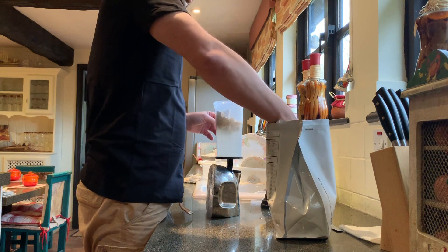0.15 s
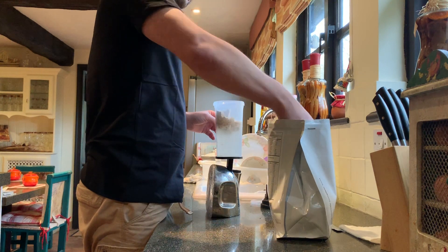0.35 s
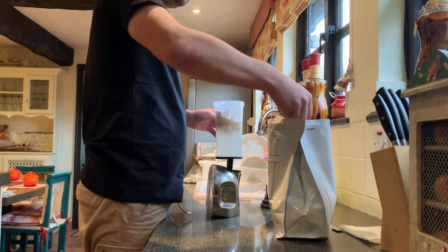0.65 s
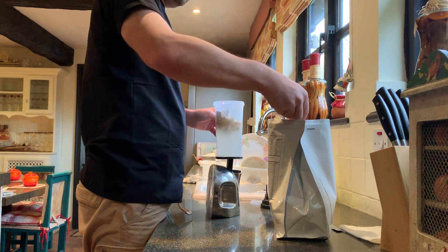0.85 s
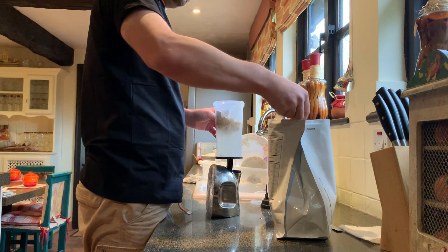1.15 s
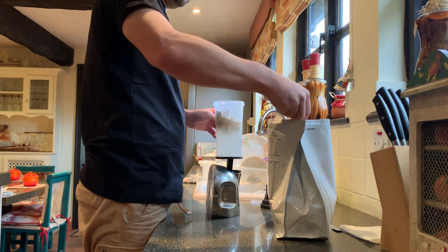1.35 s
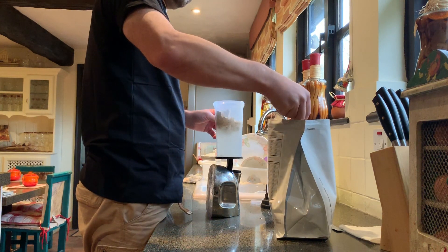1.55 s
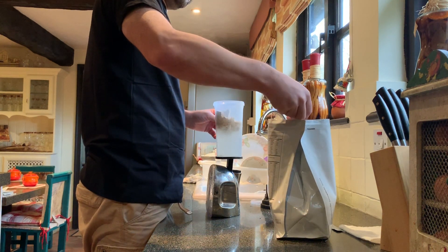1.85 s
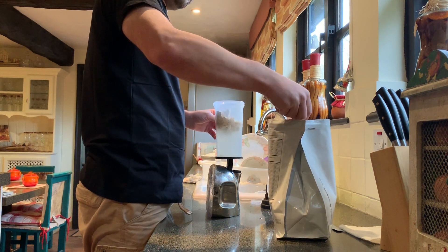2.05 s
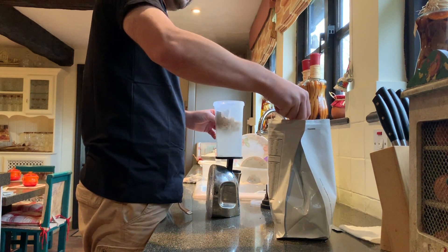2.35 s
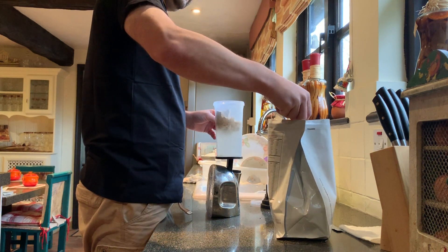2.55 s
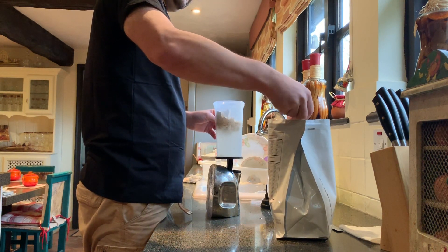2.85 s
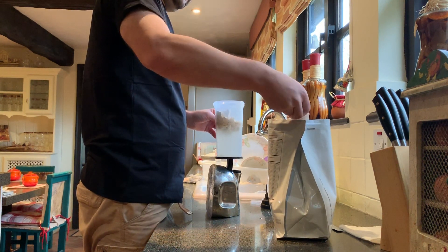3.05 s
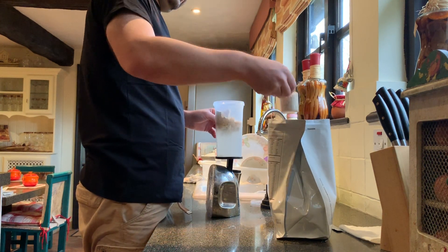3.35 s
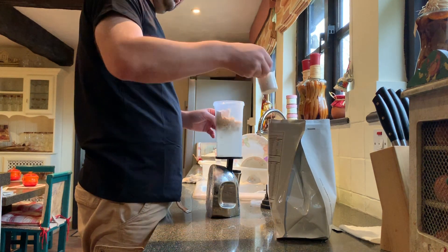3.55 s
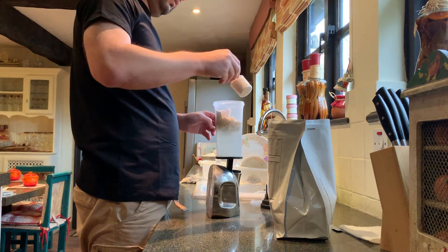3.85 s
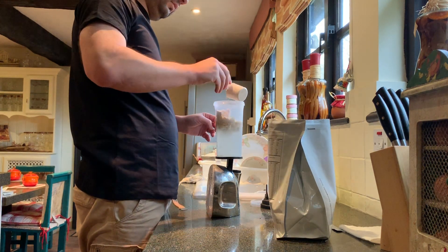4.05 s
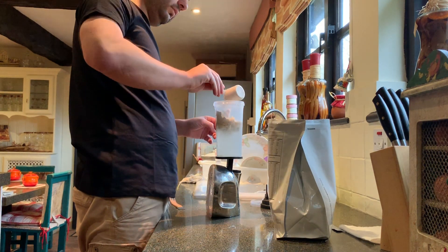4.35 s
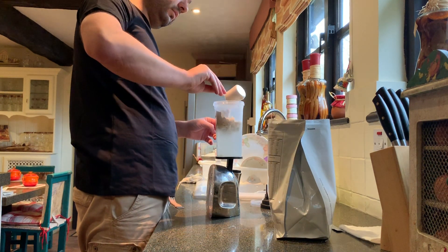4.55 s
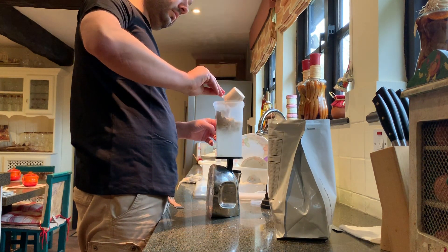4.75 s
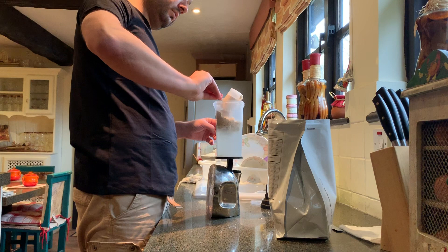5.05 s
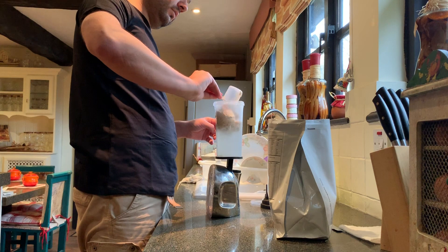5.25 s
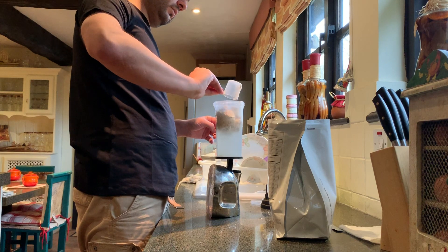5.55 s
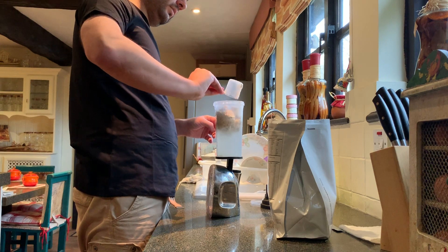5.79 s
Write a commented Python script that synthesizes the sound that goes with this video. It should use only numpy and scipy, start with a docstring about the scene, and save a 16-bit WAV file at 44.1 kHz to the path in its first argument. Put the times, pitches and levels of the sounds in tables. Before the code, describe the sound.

In a small hard kitchen with a low fridge hum, a hand and plastic scoop scrape loudly along a stiff bag of powder, crackling and thudding. Quieter, separate digs and rubs follow with gaps between. Then the scoop leaves, powder hisses very faintly, and a soft dull knock meets a plastic cup. Close phone pickup, stereo but nearly centred.

```python
"""A plastic scoop is drawn up through a stand-up bag of powder on a kitchen counter, levelled against the
inside wall in short rubs, then carried to a shaker cup. Stick-slip clicks make the stiff film crackle and the
hollow of the bag ring; noisy blows on damped modes make the packed powder and the cup thud; fine clicks hiss
as powder pours. A wavering sine is the fridge, in the air noise of a small, hard room; a phone stands near."""
import sys
import numpy as np
from scipy import signal
from scipy.fft import rfft, irfft
from scipy.io import wavfile

SR = 44100
rng = np.random.default_rng(int(sys.argv[2]) if len(sys.argv) > 2 else 0)


def to_wav(sig):
    """Store sig (one row per channel, or 1-D mono) as 16-bit WAV at the path in sys.argv[1].

    Samples outside -1..1 are clipped; the rate is SR.
    """
    pcm = np.clip(np.atleast_2d(sig), -1, 1) * 32767
    pcm = np.round(pcm).astype(np.int16)
    wavfile.write(sys.argv[1], SR, pcm.T)  # frames by channels


N = 261072
TIME = np.arange(N) / SR
FREQ = np.fft.rfftfreq(N, 1 / SR)

# All event levels are drives, before the mix gains.
# Long drags of hand and scoop along the bag. Each row: start in seconds, end in seconds, film level at the
# start in dB, film level at the end in dB, crackle in dB re film.
DRAG_ROWS = [(0.253, 0.331, -65, -48.5, -10), (0.355, 0.397, -39.5, -37.5, -2.5),
             (0.435, 0.609, -47, -48, -4), (0.816, 0.903, -62.5, -47, -10)]
DRAG_ATTACK_S, DRAG_RELEASE_S = 0.016, 0.0066
# Light rubs of the scoop on the film. Each row: peak in seconds, film level in dB, ring of the caught crease in Hz.
RUB_ROWS = [(.222, -64.5, 1310), (0.6, -45, 2100), (0.909, -46, 1920), (1.415, -73.5, 2160),
            (1.597, -74, 1380), (1.814, -71, 2580), (1.848, -62.5, 2850), (2.208, -63.5, 3150),
            (2.353, -57.5, 3030), (2.593, -62, 1320), (2.642, -66, 1810), (2.965, -70, 3240),
            (3.035, -59, 920)]
RUB_ATTACK_S, RUB_RELEASE_S, RUB_CRACKLE_DB = 0.016, 0.016, -9.5
# Digs, rubs that also shove the packed powder. Each row: peak in seconds, film level in dB, ring of the
# caught crease in Hz, thud level in dB, contact cut-off in Hz.
DIG_ROWS = [(1.125, -64, 1850, -47.5, 170), (1.233, -61, 3140, -51.5, 350), (1.360, -56, 2910, -49, 544),
            (1.658, -63.5, 1090, -48.5, 225), (2.083, -56, 3160, -45.5, 158),
            (2.110, -58, 2220, -48.5, 267), (2.283, -57, 1870, -49, 311), (2.411, -51, 1080, -41.5, 686),
            (2.442, -56, 806, -41.5, 446), (2.479, -55.5, 3130, -45, 250), (2.531, -60.5, 750, -48, 616),
            (2.672, -63.5, 1100, -49, 337)]
DIG_ATTACK_S, DIG_RELEASE_S, DIG_CRACKLE_DB, DIG_GRIND_S = 0.013, 0.024, -12.5, 0.0095
# Wrinkles of the film that snap through. Each row: peak in seconds, film level in dB.
SNAP_ROWS = [(.169, -62.5), (.218, -61.5), (.399, -41), (.9055, -39), (.909, -37.5), (1.351, -55),
             (1.950, -65), (2.060, -62), (2.0705, -47), (2.180, -56.5), (2.409, -50), (3.032, -54.5)]
SNAP_ATTACK_S, SNAP_RELEASE_S, SNAP_CRACKLE_DB = 0.0011, 0.0064, -5.5
# The hand in the bag keeps the film faintly astir; crackle re film.
STIR_START_S, STIR_END_S, STIR_DB, STIR_CRACKLE_DB = 1.35, 2.3, -80, 0
# A film drive of REFERENCE_DB drives the hollow HOLLOW_DB harder; growth in dB per dB of film.
REFERENCE_DB, HOLLOW_DB, HOLLOW_GROWTH = -55, 2.5, 0.88
# Rings of the stiff film and the scoop. Each row: frequency in Hz, width in Hz, relative level in dB.
FILM_RINGS = [(1343, 125, 0.5), (1670, 150, -10), (2220, 15, 3), (2328, 140, 5.5), (2925, 71, 1),
              (3190, 66, -3), (3565, 45, 2.5), (4325, 350, -0.5), (4300, 19, 1), (5080, 740, -6.5),
              (6500, 1050, -6)]
# Resonances of the air inside the bag. Each row: frequency in Hz, width in Hz, relative level in dB.
HOLLOW_RINGS = [(217, 16, 2.5), (255.4, 29, 2.5), (375, 123, -2), (614, 54, 2), (775, 77, 1),
                (886, 76, -1.5), (1057, 54, 0), (1074, 76, -0.5), (1253, 85, -2.5), (1407, 66, 0),
                (1803, 97, -1.5)]
# Broad colour of a slip on the film. Each row: frequency in Hz, relative level in dB per Hz.
SLIP_COLOUR = [(300, -18.5), (900, -0.5), (1750, -2), (2500, 2), (3400, 1.5), (4600, -9), (6400, -12),
               (9000, -28), (16000, -20)]
# Colour of the finest crackle. Each row: frequency in Hz, relative level in dB per Hz.
CRACKLE_COLOUR = [(2000, -63), (5000, -17), (7000, -8.5), (8500, 2.5), (11000, -1), (13500, 0.5),
                  (16000, -6.5)]
# Big creases that catch in the long drags. Each row: peak in seconds, length in seconds, ring in Hz, level in dB.
CREASE_ROWS = [(.337, 0.0035, 1130, -34), (0.366, 0.023, 3630, -39.5), (0.39, 0.014, 1307, -34.5),
               (.401, 0.0025, 1260, -31), (0.571, 0.018, 1280, -43), (.85, 0.0093, 810, -49)]
# Crease caught by a rub or dig: length, level re film.
CATCH_S, CATCH_DB = 0.014, -0.5
# Bumps of the scoop deep in the bag. Each row: time in seconds, level in dB, contact cut-off in Hz,
# grinding in seconds.
BUMP_ROWS = [(.033, -41, 1210, .003), (.058, -42.5, 199, 0.0043), (.121, -45.5, 730, 0.0064),
             (.163, -46.5, 262, 0.0071), (.318, -45, 230, 0.0089), (.336, -37.5, 705, 0.0043),
             (.3988, -48, 3000, 0.0022), (.49, -45, 282, 0.017), (.60, -50.5, 298, .008),
             (.918, -48, 390, 0.0022), (1.623, -50, 141, .016), (2.456, -43, 140, .0025)]
# Modes of the filled bag standing on the counter. Each row: frequency in Hz, T60 in seconds, relative level in dB.
BAG_MODES = [(54.2, 0.22, -4), (102.6, 0.15, -5), (146, 0.084, -4.5), (241, 0.045, -1.5), (336, 0.1, -2),
             (475, 0.034, 3), (641, 0.04, 5.5), (708, 0.025, 8), (810, 0.03, -13), (1170, 0.008, 6),
             (1288, 0.042, 4.5), (1700, 0.044, -3.5), (2310, 0.027, -13)]
# Knocks as the scoop is carried over and meets the shaker cup. Each row: time in seconds, level in dB,
# contact cut-off in Hz, grinding in seconds.
KNOCK_ROWS = [(3.722, -62.5, 1300, 0.0011), (4.094, -47, 417, 0.0075), (4.118, -52, 1180, 0.013),
              (4.15, -57, 450, 0.005)]
# Modes of the part-filled plastic cup. Each row: frequency in Hz, T60 in seconds, relative level in dB.
SHAKER_MODES = [(104.6, 0.2, 0.5), (166, 0.12, 2), (263, 0.047, 0), (444, 0.018, 2), (738, 0.063, 2.5),
                (885, 0.03, -2), (1054, 0.046, -3.5), (1250, 0.025, 2.5), (1760, 0.012, 1),
                (2280, 0.013, 4)]
# Powder slides out of the tipped scoop, louder until it is empty.
POUR_START_S, POUR_END_S, POUR_START_DB, POUR_END_DB = 3.88, 4.47, -78, -73
POUR_ATTACK_S, POUR_RELEASE_S = 0.28, 0.11
# Fine hiss of the pour. Each row: frequency in Hz, relative level in dB per Hz.
POUR_COLOUR = [(1000, -11), (4400, -3.5), (6000, -6.5), (7800, -2.5), (9500, 0.5), (11500, 2.5),
               (13000, -4), (15500, -17)]
# Ring of the room. Each row: frequency in Hz, T60 in seconds.
ROOM_DECAY = [(100, 0.37), (500, 0.25), (3000, 0.23), (8000, 0.2), (16000, 0.16)]
# Air and machine noise of the kitchen. Each row: frequency in Hz, relative level in dB per Hz.
KITCHEN_COLOUR = [(15, -22.5), (30, -8), (38, -12.5), (50, 2), (62, -10), (78, -11.5), (100, -13),
                  (135, -21.5), (200, -24.5), (275, -25.5), (345, -18.5), (520, -31), (1100, -37),
                  (3000, -42.5), (7000, -46), (12000, -46), (15000, -48.5)]
KITCHEN_DB, HUM_HZ, HUM_DB = -57.5, 48.45, -59.5
# Colour difference of the phone's ports. Each row: frequency in Hz, left minus right in dB.
PORT_BALANCE = [(60, -1.5), (130, -1.5), (280, 0.1), (1000, 1.4), (2300, 2), (4000, 0), (5800, -0.7),
                (8000, 0)]
PORT_LAG_S, TOP_HZ = 0.00026, 15850


def bag():
    """Slips ring the film and the air in the bag; the rubbed film adds a fine crackle."""
    film_gain, hollow_gain, crackle_gain = rubbing()
    # the scoop catches and lets go, so the slips come in clusters
    steps_s = np.arange(0, TIME[-1], 1 / 260)
    catch_db = 3.3 * np.interp(TIME, steps_s, rng.standard_normal(len(steps_s)))
    catch = unit(undb(catch_db))
    clicks = slips(rate_hz=2800, spread_db=3.5) * catch
    # sparse buckling snaps stand out of the grit
    snaps = slips(rate_hz=150, spread_db=-2)
    grit = unit(slips(rate_hz=4200, spread_db=3.8) * catch + undb(-5) * snaps)
    ringing = undb(-5) * through(clicks * film_gain, resonances(FILM_RINGS))
    scrape = undb(-3) * through(grit * film_gain, colour(SLIP_COLOUR))
    hollow = undb(-2) * through(clicks * hollow_gain, resonances(HOLLOW_RINGS))
    crackle = through(grit * crackle_gain, colour(CRACKLE_COLOUR))
    return ringing + scrape + hollow, crackle


def rubbing():
    """Gains of film, hollow and crackle; the harder the rub, the more the film outweighs the hollow."""
    moves = [(stroke(*drag, DRAG_ATTACK_S, DRAG_RELEASE_S), crackle_db) for *drag, crackle_db in DRAG_ROWS]
    stir = stroke(STIR_START_S, STIR_END_S, STIR_DB, STIR_DB, DRAG_ATTACK_S, DRAG_RELEASE_S)
    moves += [(stir, STIR_CRACKLE_DB),
              (touches(RUB_ROWS, RUB_ATTACK_S, RUB_RELEASE_S), RUB_CRACKLE_DB),
              (touches(DIG_ROWS, DIG_ATTACK_S, DIG_RELEASE_S), DIG_CRACKLE_DB),
              (touches(SNAP_ROWS, SNAP_ATTACK_S, SNAP_RELEASE_S), SNAP_CRACKLE_DB)]
    film = np.sqrt(sum(gain ** 2 for gain, _ in moves))
    crackle = np.sqrt(sum((gain * undb(db)) ** 2 for gain, db in moves))
    hollow = undb(REFERENCE_DB + HOLLOW_DB) * (film / undb(REFERENCE_DB)) ** HOLLOW_GROWTH
    return film, hollow, crackle


def stroke(start_s, end_s, start_db, end_db, attack_s, release_s):
    """Gain of one movement: it sets in, runs evenly in dB from start to end and dies away."""
    early = np.maximum(start_s - TIME, 0) / attack_s
    late = np.maximum(TIME - end_s, 0) / release_s
    level = undb(np.interp(TIME, [start_s, end_s], [start_db, end_db]))
    return level * np.exp(-np.minimum(early ** 2 + late, 20))


def touches(events, attack_s, release_s):
    """Joint gain of brief contacts that share one attack and one release."""
    return np.sqrt(sum(stroke(s, s, db, db, attack_s, release_s) ** 2 for s, db, *_ in events))


def slips(rate_hz, spread_db):
    """Tiny stick-slip clicks at random moments and of either sign, their sizes spread exponentially in dB."""
    sizes = undb(spread_db * np.minimum(rng.exponential(size=N), 4))
    happens = rng.random(N) < rate_hz / SR
    return unit(happens * sizes * rng.choice([-1, 1], N))


def creases(width_share):
    """A run of slips along one crease rings its own short resonance; every rub and dig catches one."""
    out = 0
    clicks = slips(rate_hz=3900, spread_db=2)
    caught = [(s, CATCH_S, hz, film_db + CATCH_DB) for s, film_db, hz, *_ in RUB_ROWS + DIG_ROWS]
    for peak_s, length_s, hz, db in CREASE_ROWS + caught:
        push = np.exp(-np.minimum(((TIME - peak_s) / length_s) ** 2, 30))
        ring = through(clicks * push, resonances([(hz, width_share * hz, 0)]))
        # same energy as the push, whatever clicks fall in it
        out = out + undb(db) * ring * np.sqrt(np.sum(push ** 2) / np.sum(ring ** 2))
    return out


def blows(events, modes, grind_db, detune=0.14, size=11025):
    """Each blow rings damped modes; a softer contact weakens the upper ones, and powder grinds around it."""
    out, t = np.zeros(N + size), TIME[:size]
    hz, t60_s, mode_db = np.transpose(modes)[:, :, None]
    lead = int(0.025 * SR)  # room for grinding before the hit
    for hit_s, db, contact_hz, grind_s in events:
        # the load shifts between blows, and the modes with it
        shifted_hz = hz * (1 + detune * rng.uniform(-1, 1, hz.shape))
        rings = undb(mode_db) * np.exp(-np.log(1000) * t / t60_s) * np.sin(2 * np.pi * shifted_hz * t)
        rings[1::2] *= -1
        ring = np.sum(rings / np.sqrt(1 + (hz / contact_hz) ** 4), axis=0)
        force = rng.standard_normal(size) * np.exp(-np.abs(t - t[lead]) / grind_s)
        force *= undb(grind_db) / np.sqrt(np.sum(force ** 2))
        force[lead] += 1
        blow = signal.fftconvolve(force, ring)[:size]
        start = max(int(hit_s * SR) - lead, 0)
        # level: the blow's whole energy taken over 13 ms
        out[start:start + size] += undb(db) * blow / np.sqrt(np.sum(blow ** 2) / (0.013 * SR))
    return out[:N]


def pour():
    """Many fine grains slide off the scoop into the cup: dense clicks with a hissing colour."""
    gain = stroke(POUR_START_S, POUR_END_S, POUR_START_DB, POUR_END_DB, POUR_ATTACK_S, POUR_RELEASE_S)
    return through(slips(rate_hz=8300, spread_db=3) * gain, colour(POUR_COLOUR))


def room(size=22050, count=9):
    """Diffuse ring of the kitchen; each octave dies at its own pace."""
    t, hz = TIME[:size], np.fft.rfftfreq(size, 1 / SR)
    noise = two_ports(size, alike_hz=790, alike_bass=0.8)
    centres_hz = TOP_HZ / 2. ** np.arange(count)[::-1]
    tail = 0
    for centre_hz, share in zip(centres_hz, np.eye(count)):
        band = irfft(noise * np.interp(hz, centres_hz, share), size)
        tail = tail + band * np.exp(-np.log(1000) * t / on_log_axis(ROOM_DECAY, centre_hz))
    return tail * (1 - np.exp(-(t / 0.00098) ** 2))  # soft onset


def kitchen():
    """Steady air noise and the slightly wavering hum of a fridge."""
    noise = two_ports(N, alike_hz=860, alike_bass=0.95)
    air = unit(irfft(noise * undb(on_log_axis(KITCHEN_COLOUR, FREQ)), N))
    steps_s = np.linspace(0, TIME[-1], 20)
    waver = np.interp(TIME, steps_s, rng.standard_normal(len(steps_s)))
    # wavers 0.32 rad in phase and 0.5 dB in level
    hum = unit(np.sin(2 * np.pi * HUM_HZ * TIME + 0.32 * waver) * undb(0.5 * waver))
    return undb(KITCHEN_DB) * air + undb(HUM_DB) * hum


def two_ports(size, alike_hz, alike_bass):
    """Spectra of diffuse noise at two close ports: alike in the bass, unrelated above."""
    hz = np.fft.rfftfreq(size, 1 / SR)
    alike = alike_bass / (1 + (hz / alike_hz) ** 2)
    mid, side = rfft(rng.standard_normal((2, size)))
    return mid * np.sqrt(1 + alike) + np.array([[1], [-1]]) * side * np.sqrt(1 - alike)


def left_late(x, lag_s):
    """Sound from the right reaches the left port a little later."""
    return irfft(rfft(x) * np.exp(-2j * np.pi * FREQ * np.array([[lag_s], [0]])), N)


def undb(db):
    """Decibels to gain."""
    return 10 ** (np.asarray(db) / 20)


def unit(x):
    """Scale to rms 1."""
    return x / np.sqrt(np.mean(x ** 2))


def through(x, response):
    """Pass a sound through a response scaled to unit energy."""
    response = response / np.sqrt(np.sum(response ** 2, axis=-1, keepdims=True))
    return signal.fftconvolve(x, response, axes=-1)[..., :N]


def on_log_axis(points, hz):
    """Read (Hz, value) points along a log-frequency axis."""
    at_hz, value = np.transpose(points)
    return np.interp(np.log(hz + 1), np.log(at_hz), value)


def colour(points, size=512):
    """Minimum-phase response with this spectrum, by folding the cepstrum."""
    level_db = on_log_axis(points, np.fft.rfftfreq(size, 1 / SR))
    cepstrum = irfft(np.log(undb(level_db)))
    cepstrum[1:size // 2] *= 2
    cepstrum[size // 2 + 1:] = 0
    return irfft(np.exp(rfft(cepstrum)))


def resonances(rows, size=8192):
    """Sum of decaying sines, one per (Hz, width in Hz, dB) resonance, with alternating signs."""
    t = TIME[:size]
    return sum((-1) ** k * undb(db) * width_hz * np.exp(-np.pi * width_hz * t) * np.sin(2 * np.pi * hz * t)
               for k, (hz, width_hz, db) in enumerate(rows))


def scene():
    """The bag and cup are heard directly and off the counter and walls; the finest crackle stays driest."""
    rustle, crackle = bag()
    rustle = rustle + creases(width_share=0.087)
    crackle = crackle + pour()
    shoves = [(s, db, contact_hz, DIG_GRIND_S) for s, *_, db, contact_hz in DIG_ROWS]
    bag_thuds = blows(BUMP_ROWS + shoves, BAG_MODES, grind_db=3)
    thuds = bag_thuds + blows(KNOCK_ROWS, SHAKER_MODES, grind_db=-2.5)
    direct = undb(-1) * rustle + undb(-0.5) * crackle + undb(2) * thuds
    send = undb(-3.5) * rustle + undb(-6.5) * crackle + undb(-3) * thuds
    reverb = through(send[None], room())
    return left_late(direct, lag_s=0.00003) + reverb + left_late(kitchen(), lag_s=0.0002)


def record(dry):
    """The phone takes the high treble from one port and feeds it to the left a little late; the top is cut."""
    tilt_db = np.array([[1], [-1]]) * on_log_axis(PORT_BALANCE, FREQ) / 2
    ports = rfft(dry) * undb(tilt_db)
    single = 1 / (1 + (7100 / (FREQ + 1)) ** 16)  # share of the right port, rising at 7100 Hz
    late = ports[1] * np.exp(-2j * np.pi * FREQ * PORT_LAG_S)
    left = np.sqrt(1 - single) * ports[0] + np.sqrt(single) * late
    top_cut = signal.ellip(10, 0.2, 70, TOP_HZ, fs=SR, output="sos")
    return signal.sosfilt(top_cut, irfft([left, ports[1]], N))


dry = scene()
out = record(dry)
to_wav(out)
```